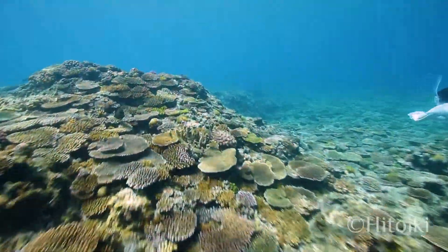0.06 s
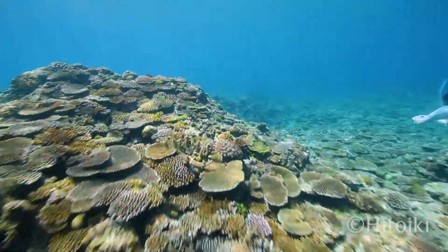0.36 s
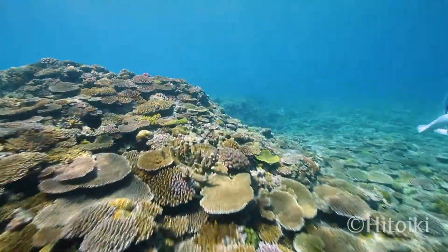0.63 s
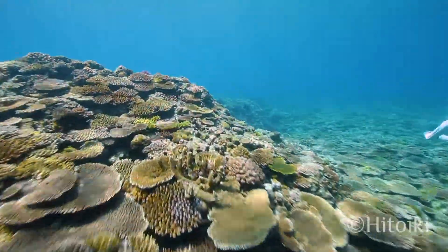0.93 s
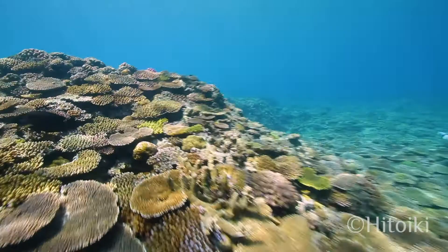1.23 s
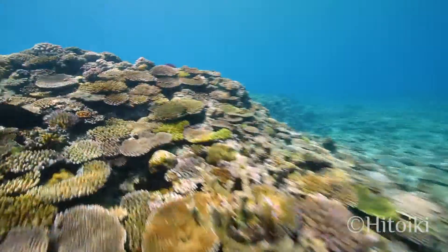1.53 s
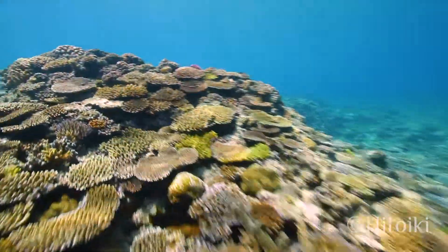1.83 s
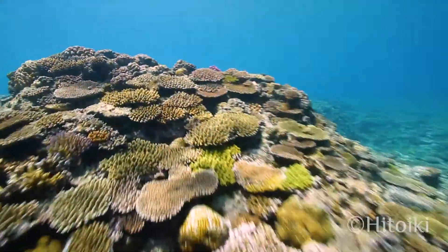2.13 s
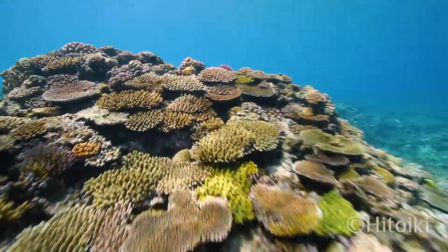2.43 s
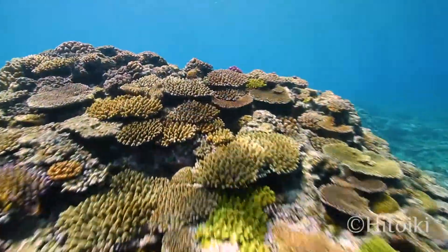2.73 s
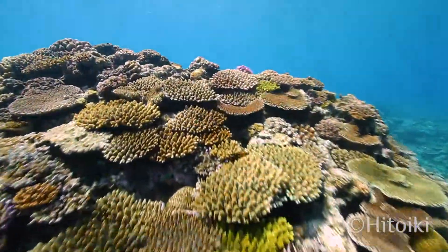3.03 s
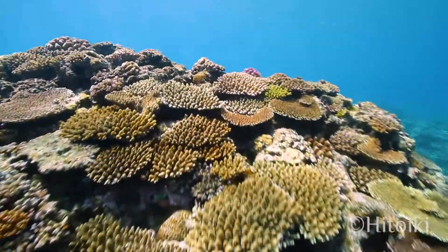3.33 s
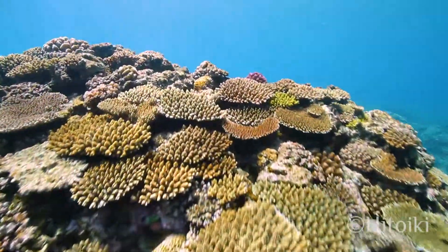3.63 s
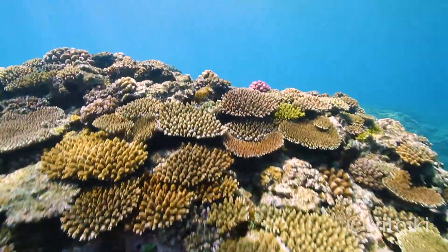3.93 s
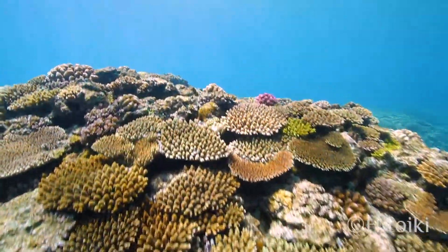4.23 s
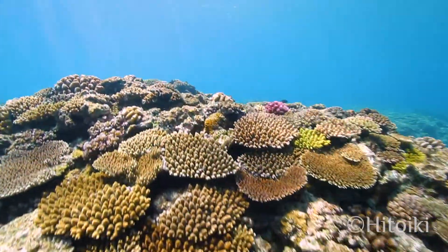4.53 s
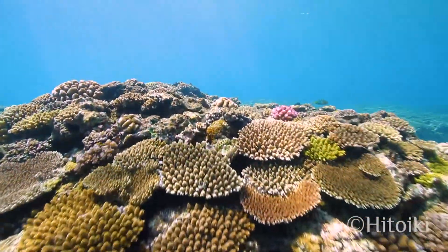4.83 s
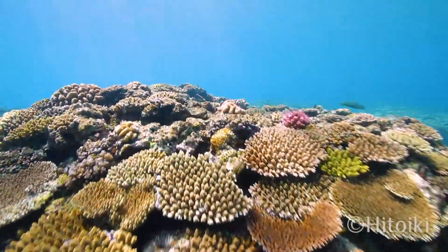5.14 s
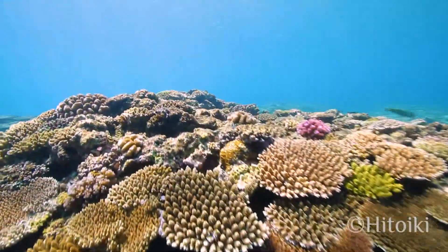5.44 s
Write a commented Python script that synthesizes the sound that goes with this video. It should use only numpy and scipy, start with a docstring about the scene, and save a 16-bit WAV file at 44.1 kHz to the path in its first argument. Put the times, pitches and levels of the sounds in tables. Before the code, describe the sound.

Fine underwater crackling and sharp clicks of snapping shrimp on a reef, with a faint low hum and one louder knock on the camera case.

```python
"""Snapping shrimp on a coral reef

Heard from a camera's waterproof housing gliding over a shallow reef. Each snap is a collapsing bubble,
echoed by the sea surface and coloured by the resonances of the housing's wall: near snaps are sharp,
farther ones crackle, the farthest merge into fizz. Small bubbles pop, handling knocks and soft slaps of
water ring the case now and then, and passing water makes it hum over the steady wash of the sea."""
import sys
import numpy as np
from scipy import signal
from scipy.fft import rfft, irfft, next_fast_len
from scipy.io import wavfile
from scipy.ndimage import map_coordinates

SR = 44100
rng = np.random.default_rng(int(sys.argv[2]) if len(sys.argv) > 2 else 0)


def bounce(signal):
    """Save signal as a 16-bit WAV file at the path given by the first command-line argument."""
    frames = np.transpose(np.atleast_2d(signal))
    limited = np.clip(frames, -1, 1)
    pcm = np.round(limited * 32767).astype(np.int16)
    wavfile.write(sys.argv[1], SR, pcm)


N = 245637

# Near snaps. Each row: start in seconds, crack level in dB, crack's spectral hump in Hz, body level in dB.
# Both levels are rms over the first 10 ms.
NEAR_SNAPS = [(0.115, -36.5, 14500, -54.5), (0.168, -48, 4000, -53.5), (0.22, -47.0, 6400, -67),
              (0.3849, -43.0, 5540, -51), (0.58, -38.5, 14300, -58.5), (0.719, -47.5, 4230, -58),
              (0.7846, -46, 3700, -56), (0.8791, -44.5, 4300, -57), (0.929, -32.5, 10800, -59),
              (1.039, -42.5, 6300, -61), (1.073, -43, 3780, -53), (1.4916, -39, 4600, -49.5),
              (1.5303, -47, 6330, -68), (1.563, -45, 4600, -58), (1.6083, -42.0, 6000, -65),
              (1.7036, -42, 8150, -68), (1.719, -40, 9900, -62), (1.874, -33.5, 13300, -42.0),
              (1.9658, -35, 12500, -76), (2.2178, -43, 6450, -56), (2.368, -37.5, 13600, -47.5),
              (2.6393, -43.5, 10300, -72), (2.846, -39.5, 3470, -53), (3.002, -31.5, 11900, -44.0),
              (3.1655, -31.5, 9900, -45.0), (3.2506, -43.5, 4330, -65), (3.3575, -40.5, 7500, -63),
              (3.613, -33.5, 3600, -49.0), (3.747, -39, 6360, -62.0), (3.775, -28.5, 9560, -63.0),
              (3.795, -37.5, 11600, -59), (3.8233, -41, 8700, -75), (4.0204, -41.0, 3900, -46.0),
              (4.0676, -46, 10200, -57.0), (4.295, -45.5, 5600, -58), (4.3297, -46.5, 6340, -53),
              (4.4223, -33, 11900, -42), (4.612, -41.5, 9650, -64), (4.704, -44.5, 3680, -57.5),
              (4.915, -39.5, 3830, -53), (4.937, -36.5, 8550, -63.0), (4.9506, -40, 7760, -73),
              (5.139, -49.5, 3870, -53.5), (5.264, -42.5, 5170, -51), (5.349, -43.5, 8100, -59.5),
              (5.436, -34, 7600, -34), (5.4929, -41, 3700, -49.0)]
# Transmission through the housing's wall. Each row: frequency in Hz, gain in dB.
WALL_TRANSMISSION = [(300, -30), (700, -20), (1250, -22), (1800, -15), (3000, -13), (4200, -11),
                     (6400, -10), (8700, -5), (10500, 0), (13400, -3), (14100, -7), (15100, -7),
                     (15800, -16)]
# Resonances of the wall. Each row: frequency in Hz, bandwidth in Hz, gain over the direct path in dB.
WALL_RESONANCES = [(797, 35, 10), (925, 50, 14), (1380, 28, 13), (1620, 80, 12), (2000, 80, 13),
                   (2150, 65, 12), (2560, 60, 11), (3380, 90, 0), (3620, 80, 4), (4880, 280, 1),
                   (5740, 120, 7), (6930, 200, -1), (7500, 300, 1), (8010, 170, 1), (9160, 220, 0),
                   (10400, 550, -4), (11300, 400, -6), (13050, 600, -1)]
# Pops of small bubbles. Each row: start in seconds, pitch in Hz, peak level in dB.
BUBBLE_POPS = [(0.046, 1910, -44), (0.695, 1740, -46.5), (0.866, 2600, -37), (1.276, 2030, -43),
               (2.166, 1900, -43), (2.576, 1720, -44.5), (2.958, 1970, -41.5), (4.044, 2540, -44)]
# Handling knocks and water slaps on the case.
# Each row: start in seconds, peak level in dB, rise in seconds, upper cutoff in Hz.
CASE_IMPACTS = [(0.469, -36, 0.0075, 455), (0.849, -41, 0.0024, 242), (1, -42.5, 0.0035, 450),
                (1.211, -35.5, 0.0053, 460), (1.335, -39, .0016, 560), (1.553, -36.5, 0.0047, 457),
                (2.042, -46, 0.0012, 500), (2.058, -40.5, 0.0021, 403), (2.637, -42, 0.0011, 584),
                (2.708, -40.5, .004, 516), (2.831, -41, .003, 457), (2.932, -13, 0.00034, 830),
                (3.015, -37, 0.00034, 980), (3.035, -36, 0.00022, 418), (4.036, -46, 0.0017, 1200),
                (4.052, -42.5, 0.00035, 1100), (4.082, -47, .0006, 900), (4.154, -35.5, 0.0025, 285),
                (4.422, -42.5, 0.00094, 1500), (4.513, -38, 0.0007, 385), (5.434, -35, 0.0019, 2200)]
# Modes of the whole case. Each row: frequency in Hz, relative level in dB, 60 dB decay time in seconds.
CASE_MODES = [(105, -9, .03), (168, -9, .04), (365, 0, .042), (630, -8, .04), (812, -4, .04),
              (920, -11, .04)]
# Hum of water streaming past the case. Each row: time in seconds, level in dB.
FLOW_LEVELS = [(0.0, -63.5), (0.5, -58), (0.72, -52.5), (1.05, -62.5), (1.21, -43), (1.42, -64.5),
               (1.54, -55.5), (1.98, -70), (2.07, -46.5), (2.21, -74.5), (2.43, -51.5), (2.59, -63.5),
               (2.79, -49), (2.87, -61.2), (3.35, -57.5), (3.6, -67), (3.88, -53), (4.33, -64),
               (4.47, -50.5), (4.62, -65.5), (5.56, -63)]
# The case's response to the stream. Each row: frequency in Hz, relative spectral density in dB.
HUM_SPECTRUM = [(25, -39), (70, -39), (150, -14.5), (250, -20), (315, -7), (368, 2.5), (425, -3.5),
                (520, -28.5), (720, -28.5), (910, -15.5), (1100, -37), (2500, -59)]
# The wash of the sea. Each row: frequency in Hz, relative spectral density in dB.
WASH_SPECTRUM = [(25, -16), (70, -9.5), (170, -1), (350, -3), (600, -6), (1000, -7.5), (2000, -11),
                 (4000, -10), (8000, -12), (15000, -13.5)]


def near_shrimp(crack_hz=(3850, 15700), body_hz=(754, 3330)):
    """Cavitation: a collapse gives a bright crack, its hump set by bubble size, over a woody body."""
    track = np.zeros(N)
    starts, crack_db, hump_hz, body_db = np.transpose(NEAR_SNAPS)[:, :, None]
    hump = spectral_hump(hump_hz, height_db=8, width_octaves=0.19)
    # Low sound lingers longer among the coral, so the body is stretched more.
    cracks = amp(crack_db) * snap_band(len(starts), crack_hz, linger=1.61, colour=hump)
    bodies = amp(body_db) * snap_band(len(starts), body_hz, linger=2.2, colour=np.ones_like)
    for start, snap in zip(starts.ravel(), cracks + bodies):
        add(track, start, snap)
    return track


def snap_band(count, band_hz, linger, colour):
    """Source and filter: one band of each collapse heard through the wall, rms 1 over its first 10 ms."""
    bursts = collapses(count, echo_db=-35.5, linger=linger)
    snaps = filtered(bursts, lambda hz: wall_response(hz) * colour(hz))
    snaps = butterworth(snaps, 2, band_hz, "band")
    return snaps / snaps[:, :SR // 100].std(axis=1, keepdims=True)


def collapses(count, echo_db, linger=1):
    """Multipath: each row is a bubble's crack, its scatter off the coral and a delayed surface echo."""
    def envelope(age):
        onset = np.clip(age / .00035, 0, 1)
        crack = np.exp(-(age / .0012) ** 2)
        scatter = .8 * np.exp(-np.abs(age) / .0033)
        return onset * (crack + scatter)

    t = np.arange(SR // 25) / SR
    smear, delay_s = rng.uniform((.85, .0082), (1.3, .0115), (count, 2)).T[:, :, None]
    stretch = smear * linger  # a longer way through the coral smears the crack
    echo = amp(echo_db) * envelope((t - delay_s) / stretch)
    return (envelope(t / stretch) + echo) * rng.standard_normal((count, len(t)))


def wall_response(hz):
    """Resonant transmission: the wall passes a bright direct sound and adds its ringing modes."""
    cepstrum = irfft(np.log(gain_along(WALL_TRANSMISSION, hz)))
    half = len(cepstrum) // 2
    cepstrum[1:half] *= 2  # folding the cepstrum makes the response causal
    cepstrum[half + 1:] = 0
    ring = sum(amp(db) * 1j * hz * width / (centre ** 2 - hz ** 2 + 1j * hz * width)
               for centre, width, db in WALL_RESONANCES)
    return np.exp(rfft(cepstrum)) * (1 + ring)


def shrimp_colony(count=600, level_db=-54.5, spread_db=16.5, centre_hz=11230, scatter_octaves=0.91):
    """Shot noise: snaps at random moments, most faint, each coloured by its bubble's size and path."""
    track = np.zeros(N)
    moments, nearness = rng.random((count, 2)).T
    hump_hz = centre_hz * 2 ** (scatter_octaves * rng.standard_normal((count, 1)))
    hump = spectral_hump(hump_hz, height_db=14.5, width_octaves=0.53)
    snaps = filtered(collapses(count, echo_db=-27), hump)
    snaps /= snaps.std(axis=1, keepdims=True)
    for start, gain, snap in zip(moments * N / SR, amp(spread_db * nearness ** 2), snaps):
        add(track, start, gain * snap)
    return amp(level_db) * unit(filtered(track, wall_response))


def far_shrimp(level_db=-58, grain_db=3):
    """Incoherent summation: countless distant snaps merge into a fine fizz, heard through the wall."""
    fizz = rng.standard_normal(N) * amp(grain_db * wobble(400))
    return amp(level_db) * unit(filtered(fizz, wall_response))


def bubble_pops(edge_ratio=1.13):
    """Bubble resonance: a freed bubble rings briefly and roughly near the pitch set by its size."""
    track = np.zeros(N)
    for (start, hz, peak_db), burst in zip(BUBBLE_POPS, collapses(len(BUBBLE_POPS), echo_db=-23)):
        pop = butterworth(burst, 2, (hz / edge_ratio, hz * edge_ratio), "band")
        add(track, start, amp(peak_db) * pop / np.abs(pop).max())
    return track


def case_knocks_and_slaps(soft_band_ratio=0.75, slip_s=.0012):
    """Modal vibration: knocks and water slaps ring the case; soft ones swell and lack bass and treble."""
    track = np.zeros(N)
    t = np.arange(SR // 8) / SR
    for start, peak_db, rise_s, high_hz in CASE_IMPACTS:
        ring = sum(amp(db - 60 * t / t60) * np.cos(2 * np.pi * hz * (1 + rng.normal(0, 0.0011)) * t)
                   for hz, db, t60 in CASE_MODES)
        swell = 1 - np.exp(-(t / rise_s) ** 2)
        impact = butterworth(ring * swell, 6, high_hz, "low")
        # A slow push lets water slip round the case and loses its bass.
        low_hz = high_hz * soft_band_ratio / (1 + (slip_s / rise_s) ** 2)
        impact = butterworth(impact, 2, low_hz, "high")
        add(track, start, amp(peak_db) * impact / np.abs(impact).max())
    return track


def flow_hum(buffet_db=3.5):
    """Forced vibration: eddies buffet the case unevenly and keep its main mode humming."""
    flow_db = np.interp(np.arange(N) / SR, *np.transpose(FLOW_LEVELS))
    return amp(flow_db) * unit(noise(HUM_SPECTRUM) * amp(buffet_db * wobble(35)))


def sea_wash(level_db=-57.5):
    """Ambient noise: the sea gives a steady broadband wash."""
    return amp(level_db) * noise(WASH_SPECTRUM)


def amp(db):
    """Decibels to gain."""
    return 10 ** (np.asarray(db) / 20)


def unit(x):
    """x at rms 1."""
    return x / np.sqrt(np.mean(x ** 2) + 1e-20)


def gain_along(points, hz):
    """Gain of (Hz, dB) points joined on a log axis."""
    point_hz, db = np.transpose(points)
    return amp(np.interp(np.log(hz + 1), np.log(point_hz + 1), db))


def spectral_hump(centre_hz, height_db, width_octaves):
    """A flat response plus a Gaussian bell in log frequency."""
    return lambda hz: 1 + amp(height_db) * np.exp(-(np.log2((hz + 1) / centre_hz) / width_octaves) ** 2)


def wobble(rate):
    """A smooth random curve, rate knots a second."""
    knots = rng.standard_normal(int(N * rate / SR) + 4)
    return map_coordinates(knots, [np.arange(N) * rate / SR])


def filtered(x, response):
    """Convolution: the spectrum of x times a complex response of frequency."""
    length = x.shape[-1]
    padded = 2 * next_fast_len(length // 2 + 4096)
    hz = np.fft.rfftfreq(padded, 1 / SR)
    return irfft(rfft(x, padded) * response(hz), padded)[..., :length]


def butterworth(x, order, cutoff_hz, kind):
    """x through a causal, maximally flat filter."""
    return signal.sosfilt(signal.butter(order, cutoff_hz, kind, fs=SR, output="sos"), x)


def noise(spectrum):
    """Coloured noise of rms 1."""
    return unit(filtered(rng.standard_normal(N), lambda hz: gain_along(spectrum, hz)))


def add(track, start_s, sound):
    """Mix a sound into the track at start_s."""
    span = track[max(round(start_s * SR), 0):][:len(sound)]
    span += sound[:len(span)]


def scene():
    """Superposition: shrimp at three distances, pops, knocks and slaps over the hum and the wash."""
    crackle = shrimp_colony()
    wash = sea_wash()
    shrimp = near_shrimp() + crackle + far_shrimp()
    return (shrimp + bubble_pops() + case_knocks_and_slaps() + flow_hum() + wash)[None]


def record(dry):
    """Band limiting: the camera cuts off steeply above 16 kHz."""
    return filtered(dry, lambda hz: 1 / np.sqrt(1 + (hz / 16000) ** 160))


dry = scene()
out = record(dry)
bounce(out)
```